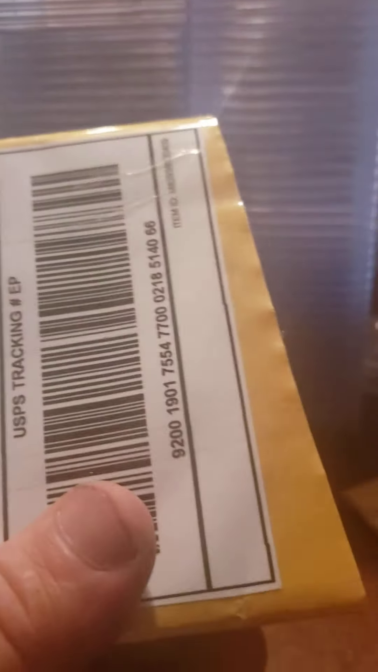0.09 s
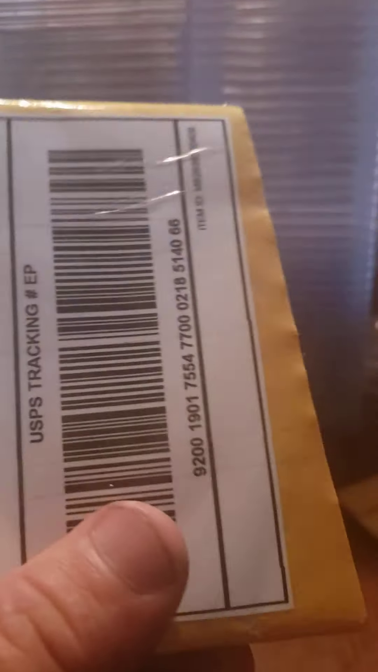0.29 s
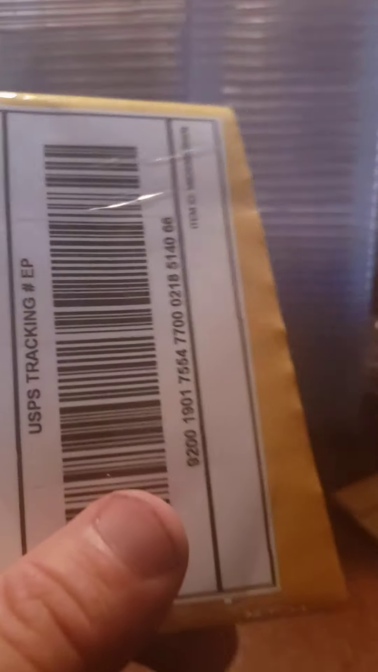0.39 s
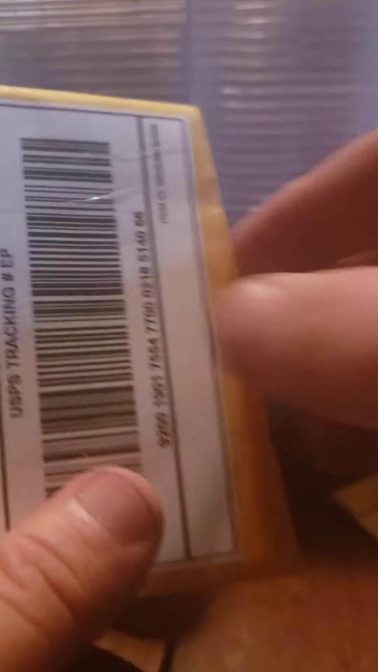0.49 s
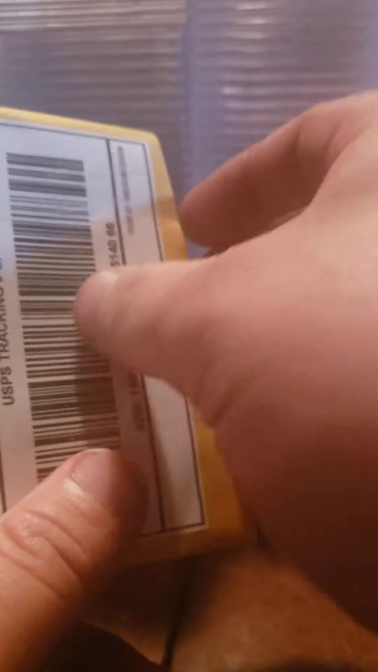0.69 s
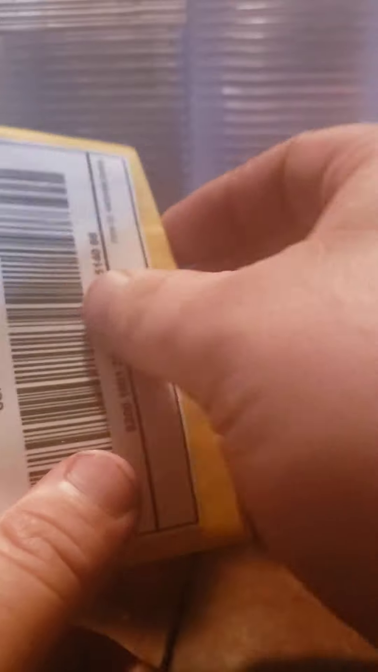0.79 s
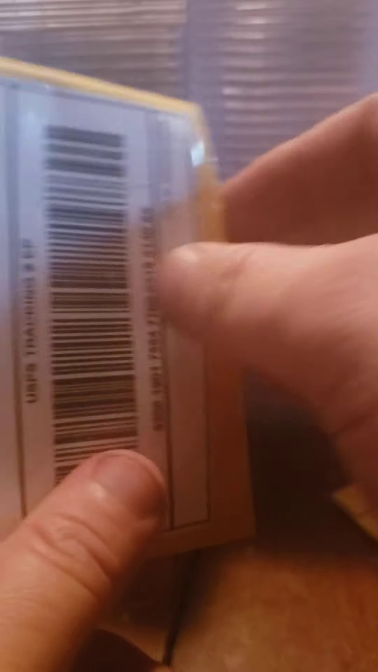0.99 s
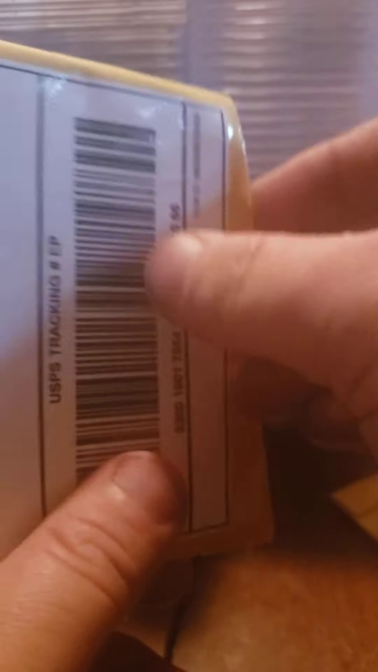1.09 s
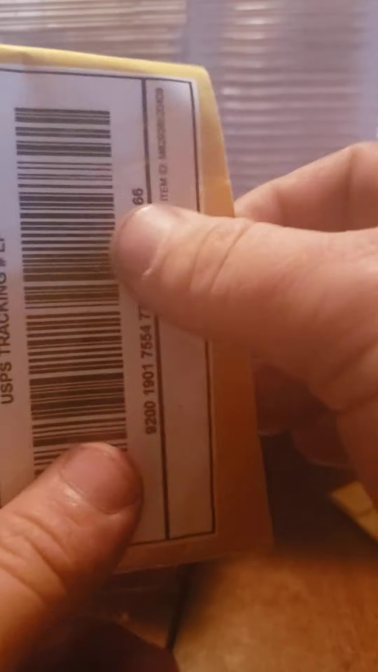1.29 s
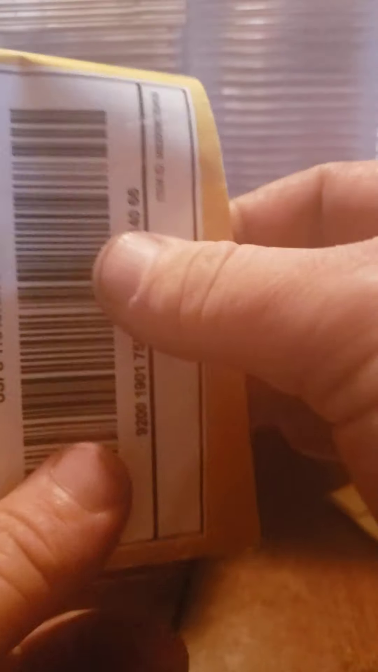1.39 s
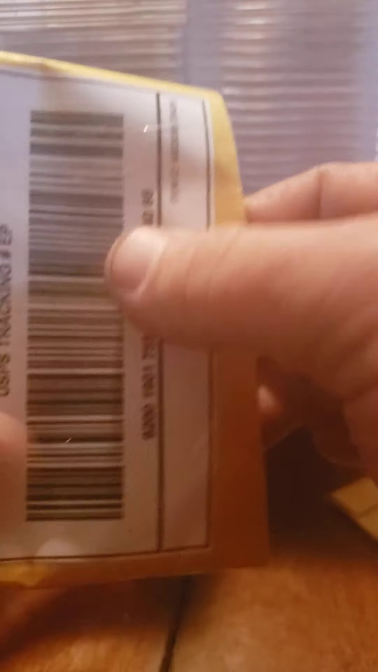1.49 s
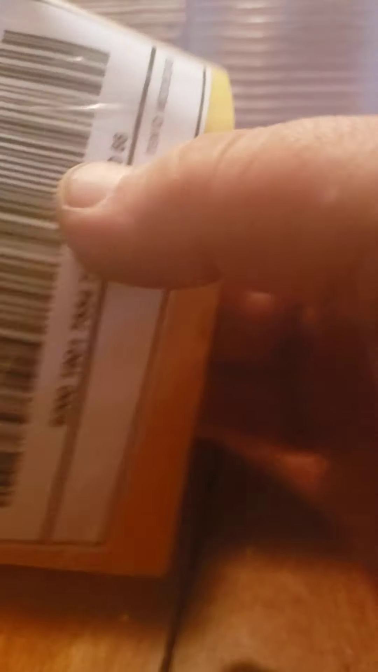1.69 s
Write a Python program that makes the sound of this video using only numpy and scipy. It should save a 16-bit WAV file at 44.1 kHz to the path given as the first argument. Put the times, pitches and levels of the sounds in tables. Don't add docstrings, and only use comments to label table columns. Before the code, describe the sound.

Sticky paper envelope flap snaps open with a loud double crack, then fingers rub and crinkle it

```python
import sys
import numpy as np
from scipy import signal
from scipy.fft import rfft, irfft
from scipy.io import wavfile
from scipy.ndimage import uniform_filter1d, map_coordinates

SR = 44100
rng = np.random.default_rng(int(sys.argv[2]) if len(sys.argv) > 2 else 0)


def generate_wav(signal):
    frames = np.transpose(np.atleast_2d(signal))
    scaled = np.clip(frames, -1, 1) * 32767
    pcm = np.round(scaled).astype(np.int16)
    wavfile.write(sys.argv[1], SR, pcm)


def invert_db(level):
    return 10 ** (np.asarray(level, dtype=float) / 20)


N = 74970
T = np.arange(N) / SR
LEFT_RIGHT = np.array([[1], [-1]])


def unit(x):
    return x / np.sqrt(np.mean(x ** 2) + 1e-30)


def read(points, hz):
    p = np.array(points, float)
    return np.interp(np.log(np.maximum(hz, 1)), np.log(p[:, 0]), p[:, 1])


def colour(x, points):
    n = x.shape[-1]
    hz = np.arange(n // 2 + 1) * SR / n
    return irfft(rfft(x) * invert_db(read(points, hz)) * (hz > 15), n)


def ring(x, hz, width):
    hz = min(hz, SR / 2.3)
    b, a = signal.iirpeak(hz, hz / max(width, 5), fs=SR)
    return signal.lfilter(b, a, x)


def high_pass(x, order, hz):
    return signal.sosfilt(signal.butter(order, hz, "high", fs=SR, output="sos"), x)


def walk(rate):
    hold = int(SR / rate)
    steps = np.repeat(rng.standard_normal(N // hold + 1), hold)
    return unit(uniform_filter1d(steps, hold)[:N])


def add(out, s, x, db):
    i = int(s * SR)
    x = x[:N - i]
    out[i:i + len(x)] += invert_db(db) * x / np.abs(x).max()


def burst(ms, spread_db, size=4096):
    u = np.arange(size) / SR / (max(ms, .2) / 1000)
    envelope = (1 - np.exp(-u / 0.046)) * np.exp(-u ** 1.47)
    unevenness = invert_db(spread_db * rng.exponential(size=size))
    return envelope * rng.standard_normal(size) * unevenness


def pops(table, width, broad_db):
    out = np.zeros(N)
    for s, db, hz, ms in table:
        crack = burst(ms, 2.23)
        tone = ring(ring(crack, hz, width * hz), hz, 2 * width * hz)
        crackle = ring(crack, 8000, 22000)
        add(out, s, unit(tone) + invert_db(broad_db) * unit(crackle), db)
    return out


def knocks(table, cycles):
    out = np.zeros(N)
    for s, db, hz in table:
        u = (T - s) * hz
        turn, bend = rng.random(2)
        swing = np.cos(2 * np.pi * (u - 0.07 * bend * u * np.abs(u) + turn / 4))
        out += invert_db(db) * np.exp(-(u / cycles) ** 2) * swing
    return out


def ports(x, lag_ms, pan_db, near_db):
    u = np.arange(400) / SR
    out = []
    for side in (1, -1):
        envelope = np.exp(-u / 0.0041) * np.minimum(u / 0.000078, 1)
        path = invert_db(near_db) * unit(rng.standard_normal(400)) * envelope / 6
        path = path - uniform_filter1d(path, size=60)
        path[0] = 1
        lag = max(side * lag_ms, 0) * SR / 1000
        late = map_coordinates(x, [np.arange(N) - lag], order=3)
        out.append(signal.fftconvolve(late, path)[:N] * invert_db(side * pan_db / 2))
    return np.array(out)


# f/Hz, level/dB per Hz
AIR = [(15, -49.5), (25, -20), (293, -11), (439, -21.5), (936, -25.5), (1070, -32), (9840, -32.5),
       (14400, -32), (16000, -43.5)]


def air():
    mid, side = colour(rng.standard_normal((2, N)), AIR)
    side = high_pass(side, 1, 500)
    return invert_db(-66.5) * (mid + 0.82 * side * LEFT_RIGHT) / np.sqrt(np.mean(mid ** 2))


# f/Hz, t/s
ROOM_T60 = [(100, 0.58), (500, 0.4), (1000, 0.34), (2500, 0.31), (6000, 0.24), (14000, 0.16)]
# f/Hz, level/dB
ROOM = [(60, -16), (420, -21.5), (650, -1.5), (1700, -1.5), (3000, -1), (6000, -5.5), (9000, -21),
        (16000, -17)]


def room(x):
    u = np.arange(SR // 2) / SR
    tail = 0
    for hz in 60 * 2 ** np.arange(0, 8.2, .5):
        mid, side = (ring(rng.standard_normal(len(u)), hz, hz / 3) for _ in range(2))
        both = mid + min(hz / 1900.0, 1) * side * LEFT_RIGHT
        tail = tail + both * invert_db(read(ROOM, hz) - 60 * u / read(ROOM_T60, hz))
    tail = tail * np.clip((u - .003) / 0.0072, 0, 1)
    tail = tail / np.sqrt(np.sum(tail ** 2) / 2)
    return signal.fftconvolve(x[None], tail, axes=1)[:, :N]


# t/s, level/dB (peak), f/Hz
BUMPS = [(.557, -54, 280), (.632, -53, 346), (.757, -50, 480), (.961, -39, 860), (1.007, -34, 870),
         (1.020, -41.5, 705), (1.075, -31.5, 380), (1.0812, -28.5, 760), (1.142, -45, 290),
         (1.188, -49, 505), (1.238, -52, 324), (1.327, -31, 730), (1.346, -40, 306), (1.365, -41.5, 263),
         (1.398, -37.5, 650), (1.492, -32.5, 810), (1.526, -36.5, 790), (1.534, -47.5, 470),
         (1.584, -50, 560), (1.6155, -34.5, 304), (1.646, -39, 640), (1.672, -46.5, 390)]
# t/s, level/dB (peak), f/Hz
THUDS = [(.03, -57, 71.4), (.14, -57.5, 80), (.265, -43, 102), (.31, -43, 77), (.35, -47, 152),
         (.42, -58.5, 59.6), (.765, -58.5, 60.2), (1.086, -35.5, 125), (1.16, -56, 70), (1.225, -51.5, 108),
         (1.35, -44.5, 48), (1.33, -42, 109), (1.40, -47, 152), (1.535, -47, 86), (1.62, -43, 101),
         (1.667, -45.5, 75.4)]


def padding():
    return knocks(BUMPS, cycles=0.88) + knocks(THUDS, cycles=0.79)


# t/s, level/dB (peak), f/Hz, length/ms
CRINKLES = [(.7315, -44, 3520, 2.7), (.7647, -51, 4900, 2.6), (.8295, -46, 2990, 3),
            (.8505, -38, 6810, 2.1), (.8614, -45.5, 6620, 3.3), (.9487, -47, 3380, 3.2),
            (.9607, -44.5, 6400, 3.7), (1.0056, -44, 3350, 4.9), (1.0176, -39.5, 2980, 1.3),
            (1.021, -39.5, 8500, 1.5), (1.028, -37, 5000, 1.4), (1.034, -42, 8000, 1.5),
            (1.0724, -44.5, 5430, 2.5), (1.0786, -30, 5600, 1.9), (1.1174, -38, 6950, 1.2),
            (1.156, -43, 4900, 6.3), (1.1724, -49.5, 2670, 3.3), (1.2032, -40, 4660, 1.3),
            (1.257, -38.5, 12500, 2.3), (1.2624, -39, 5550, 1.5), (1.294, -49, 2530, 3.6),
            (1.318, -44, 11000, 1.2), (1.3592, -42, 5000, 2), (1.3655, -35, 8000, 1.1),
            (1.382, -38, 10500, 1.7), (1.3964, -41, 2900, 2.8), (1.4115, -34, 2530, 1.5),
            (1.4725, -39.5, 13000, 1.2), (1.484, -43, 5000, 2), (1.4915, -34.5, 3900, 1.7),
            (1.5243, -40, 2770, 2), (1.5328, -33, 2580, 2.6), (1.543, -45, 9500, 2.2),
            (1.562, -49, 5200, 1.5), (1.5822, -40.5, 7050, 2), (1.595, -48, 9500, 1.7),
            (1.6068, -33, 6900, 0.9), (1.614, -41, 2200, 2.5), (1.638, -35, 5000, 1.3),
            (1.6455, -40, 1800, 1.9)]


def creases():
    return invert_db(4.0) * pops(CRINKLES, width=.9, broad_db=-4.5)


# start t/s, end t/s, rubbing level/dB, grip level/dB and brightness/dB re rubbing
STROKES = [(-.02, 0.011, -52.5, -10, 6), (0.023, 0.057, -55, -12.5, -1.5), (0.049, 0.137, -70, -1.5, 7),
           (0.13, 0.234, -63, -5, 2), (0.561, 0.651, -63.5, -6, 2.5), (0.72, 0.754, -60, -1, 4),
           (0.763, 0.828, -60, -6.5, -2), (0.83, .876, -56, -9, 4), (0.879, 0.934, -67, -1.5, -4),
           (0.943, 0.975, -49.5, -5.5, -4.5), (0.979, 1.001, -59, -9, -2), (1, 1.033, -50, -1, 4),
           (1.037, 1.087, -50, -0.5, 4.5), (1.092, 1.191, -61, -6, 0.5), (1.198, 1.298, -64, 1.5, 6.5),
           (1.291, 1.329, -48.5, -3, -2), (1.328, 1.354, -44, -2, -3), (1.35, 1.402, -46, -2, 2),
           (1.395, 1.423, -49.5, -0.5, 4.5), (1.426, 1.448, -54, -1, 7), (1.45, 1.473, -57, -6, 2),
           (1.478, 1.501, -47.5, -1, 2), (1.502, 1.549, -55.5, 1, 6), (1.548, 1.635, -53, -5, 3),
           (1.64, 1.72, -48.5, -3.5, 3.5)]
# f/Hz, level/dB per Hz
RUB = [(590, -29.5), (1000, -13), (1300, -11.5), (2200, 0), (3500, -1.5), (5970, 1.5), (9000, -11.5),
       (15500, -9.5)]
# f/Hz, level/dB per Hz
GRIP = [(24, -46.5), (40, -6), (118, 2), (163, -1), (316, 1.5), (488, -9.5), (787, -5), (1210, -16),
        (1600, -6), (2080, -43), (3520, -120)]


def fingers():
    edge_ms, grains_per_s, spread_db, flicker_db = 3.7, 3000, 4, 3
    rub_gain, grip_gain, sheen_gain = 0, 0, 0
    for start, end, db, grip_db, bright_db in STROKES:
        outside = np.maximum(start - T, T - end)
        on = 1 / (1 + np.exp(np.clip(outside * 4000 / edge_ms, -40, 40)))
        rub_gain = rub_gain + on * invert_db(db)
        grip_gain = grip_gain + on * invert_db(db + grip_db)
        sheen_gain = sheen_gain + on * invert_db(db + bright_db)

    chance, sign, size = rng.random((3, 2, N))
    grains = (chance < grains_per_s / SR) * np.sign(sign - .5) * invert_db(-spread_db * np.log(size + 1e-6))
    rub = unit(colour(unit(grains) + 1.33 * rng.standard_normal((2, N)), RUB))
    dull = signal.sosfiltfilt(signal.butter(1, 5000, fs=SR, output="sos"), rub)
    sheen = (rub - dull) * sheen_gain * invert_db(flicker_db * walk(150))
    rub = dull * rub_gain * invert_db(flicker_db * walk(89.9)) + sheen

    grip = unit(colour(rng.standard_normal((2, N)), GRIP))
    grip = grip * grip_gain * invert_db(flicker_db * walk(44.96))
    return rub[0] + grip[0], 0.6 * rub[1] + 0.3 * grip[1]


def hands():
    mid, side = fingers()
    handling = mid + creases() + padding()
    near = ports(handling, lag_ms=-0.092, pan_db=5.5, near_db=-15) + side * LEFT_RIGHT
    return near + invert_db(-12.5) * room(handling)


# t/s, level/dB (peak), f/Hz, length/ms
RATTLES = [(.0015, -48.5, 760, 19), (.021, -48, 8000, 1.5), (.036, -42, 710, 6.2), (.0422, -34, 8140, 1.8),
           (.050, -57, 5100, 5), (.257, -14, 1650, 4.4), (.262, -24, 7600, 2.7), (.265, -20.5, 800, 8),
           (.269, -24, 1750, 4.3), (.278, -22, 3080, 2.2), (.279, -25, 6400, 3.3), (.287, -29, 730, 4.7),
           (.296, -27, 3060, 3), (.3005, -18.5, 760, 5), (.309, -25, 890, 2.3), (.3155, -25, 6300, 2.3),
           (.316, -25.5, 3000, 2), (.323, -24.5, 750, 1.8), (.3285, -25, 2580, 1), (.329, -31.5, 1080, 2),
           (.336, -24, 1190, 3.4), (.344, -32, 2370, 3.3), (.352, -33, 760, 4.5), (.375, -38.5, 1280, 3.8),
           (.39, -45.5, 1750, 6)]


def rattle():
    ticks = pops(RATTLES, width=0.57, broad_db=-16.5)
    return ports(ticks, lag_ms=0.269, pan_db=-1.7, near_db=-5)


# t/s, level/dB (peak), crack length/ms, left-right/dB
SNAPS = [
    (0.1333, -22.5, 1.42, -4),
    (.1398, -28.5, 1.6, 11),
    (.2410, -13.5, 1.6, -2.5),
    (0.2521, -2.5, 0.44, 0),
    (0.253, -0.5, 1.41, 0),
]
# f/Hz, width/Hz, level/dB
SMALL_RING = [(743, 36, 4), (1290, 170, -0.5), (2200, 830, -1), (3190, 450, 6.5), (4200, 340, 3),
              (11000, 3300, -6)]
FIRST_RING = [(689, 200, -14.5), (1800, 190, -7), (2613, 370, -1.5), (4450, 420, -2), (12000, 360, -22.5)]
MAIN_RING = [(237, 150, -8), (760, 100, -2.5), (980, 220, -9.5), (1750, 260, 1), (2450, 300, -6.5),
             (4270, 580, -7.5), (5480, 180, -6), (12500, 2500, -3)]


def snaps():
    out, kick = 0, np.zeros(N)
    rings = (SMALL_RING, SMALL_RING, FIRST_RING, MAIN_RING, MAIN_RING)
    for (s, db, ms, pan_db), peaks in zip(SNAPS, rings):
        crack = burst(ms, 2.32)
        body = invert_db(-15) * ring(crack, 2500, 4500)
        for hz, width, ring_db in peaks:
            body = body + invert_db(ring_db) * np.sqrt(300 / width) * ring(crack, hz, 0.9 * width)
        one = np.zeros(N)
        add(one, s, high_pass(body, 2, 400), db)
        out = out + ports(one, lag_ms=0.269, pan_db=pan_db, near_db=-5)
        kick[int(s * SR)] = invert_db(db) * np.sqrt(ms)
    return out + invert_db(4.5) * room(kick)


def scene():
    return air() + hands() + rattle() + snaps()


def band_limit(x):
    return signal.sosfilt(signal.butter(12, 16860, fs=SR, output="sos"), x)


def record(dry):
    rounded = np.tanh(.6 * dry) / .6
    top_cut = signal.ellip(8, .3, 50, 15900, fs=SR, output="sos")
    mix = signal.sosfilt(top_cut, rounded)
    return band_limit(mix)


dry = scene()
out = record(dry)
generate_wav(out)
```